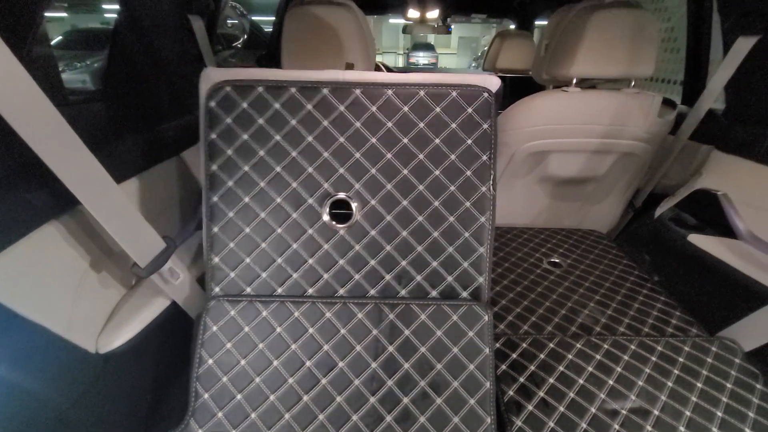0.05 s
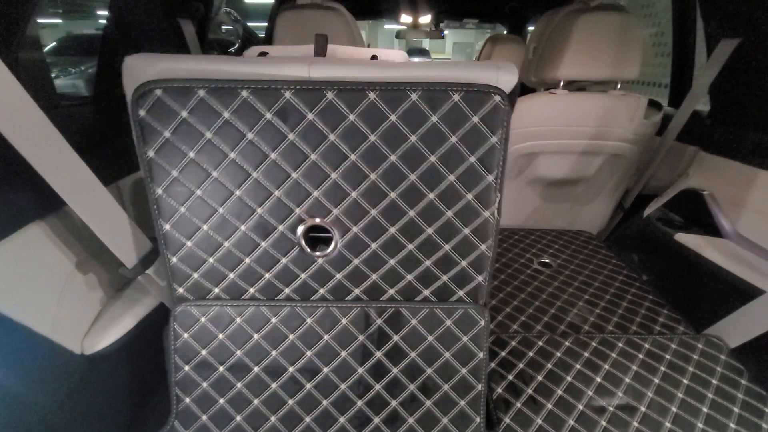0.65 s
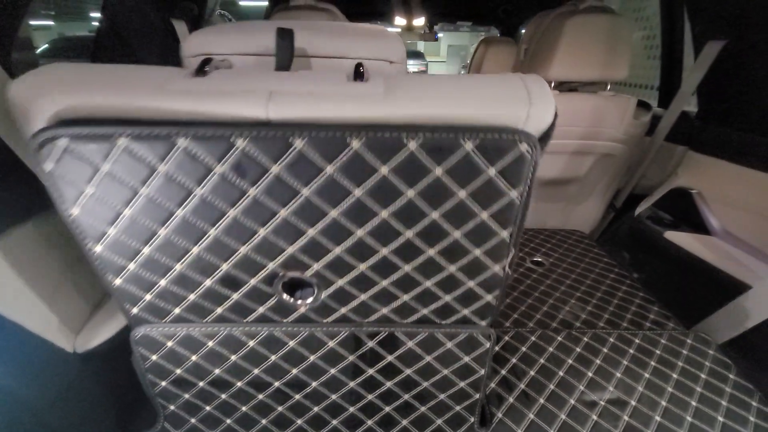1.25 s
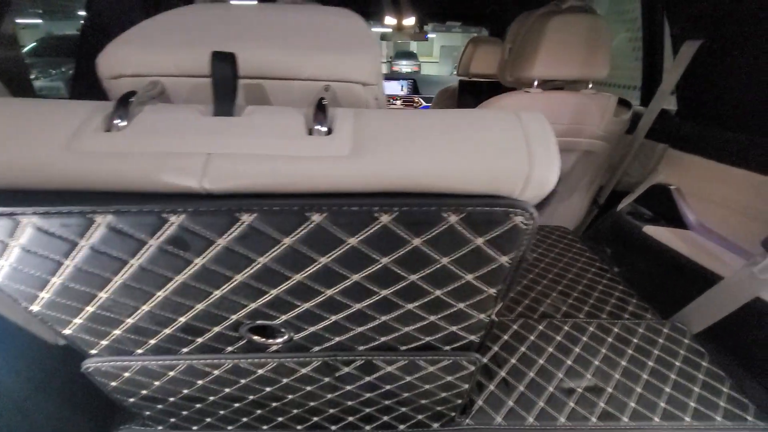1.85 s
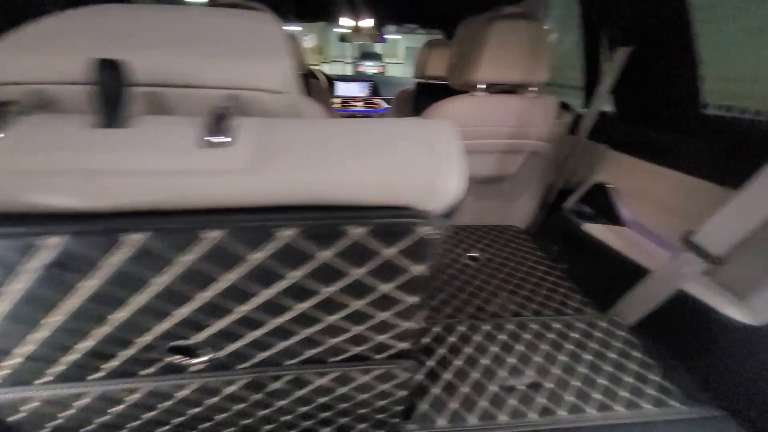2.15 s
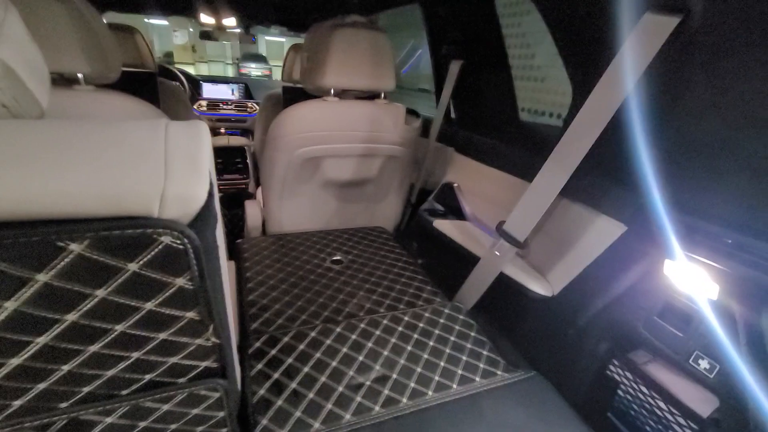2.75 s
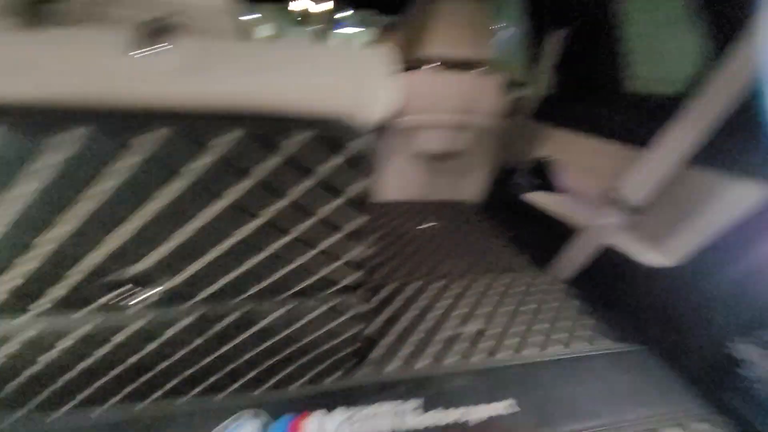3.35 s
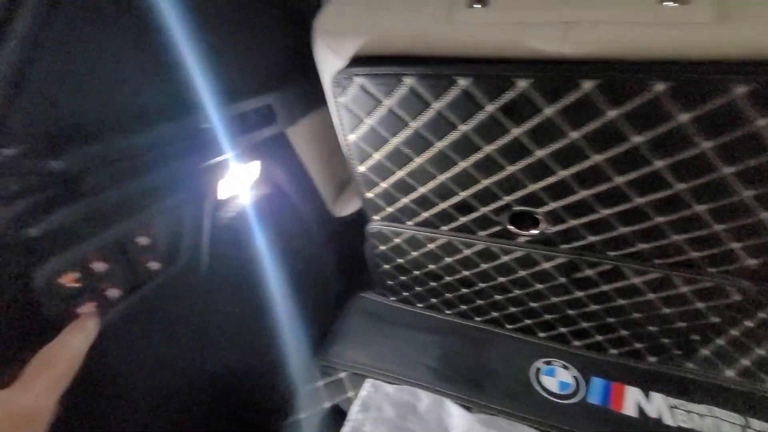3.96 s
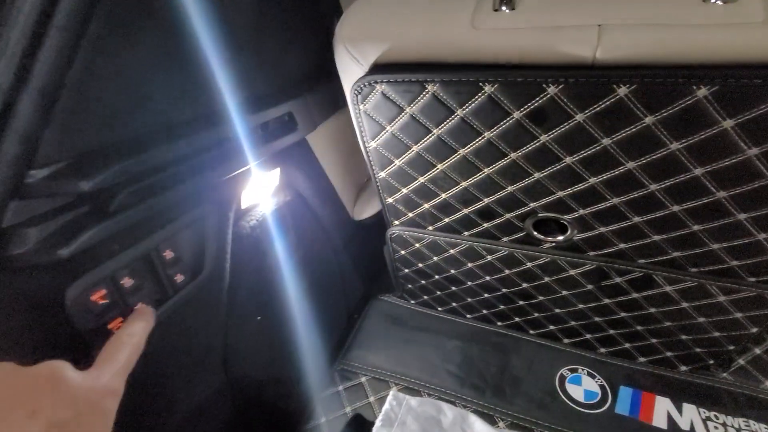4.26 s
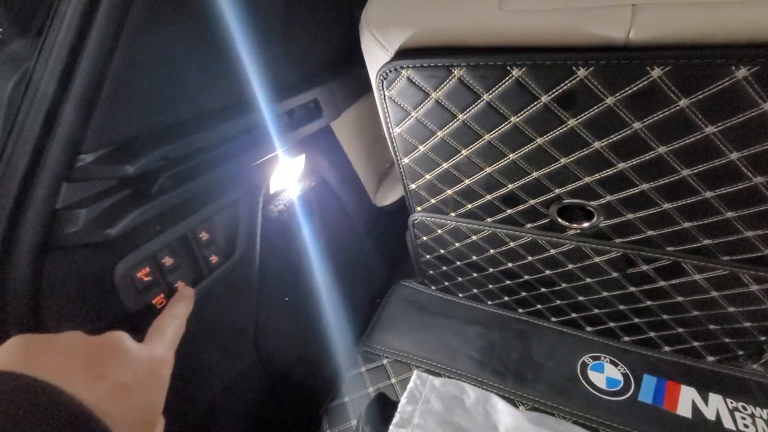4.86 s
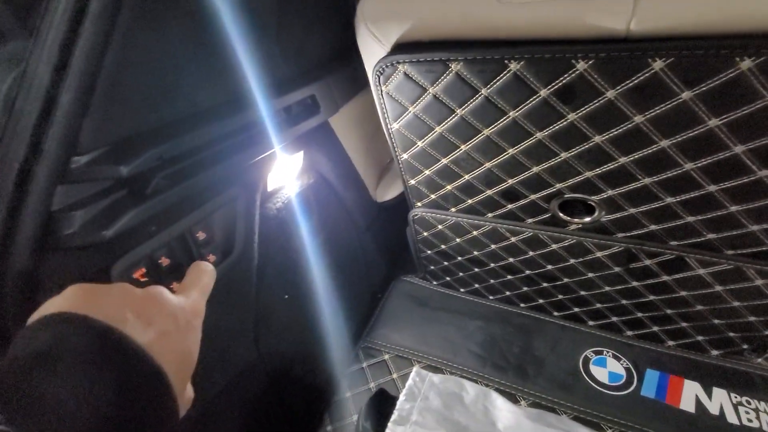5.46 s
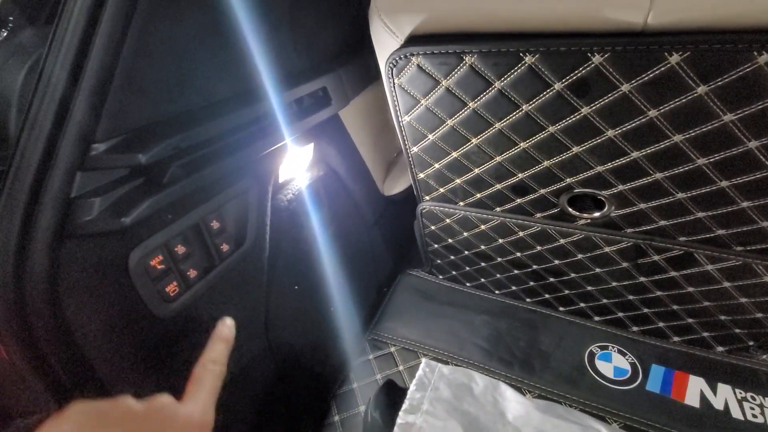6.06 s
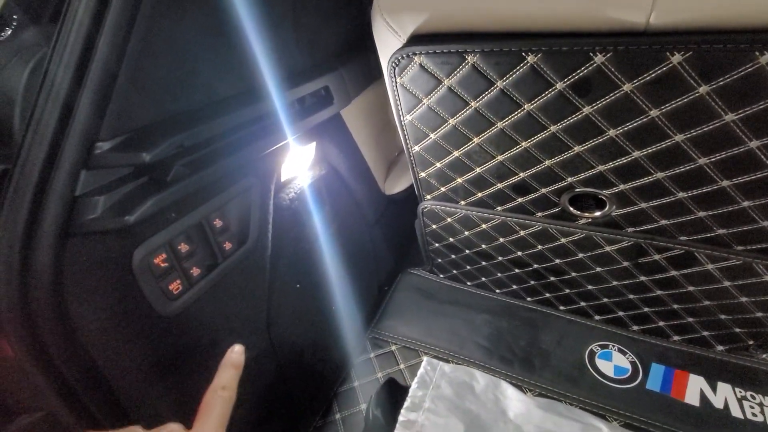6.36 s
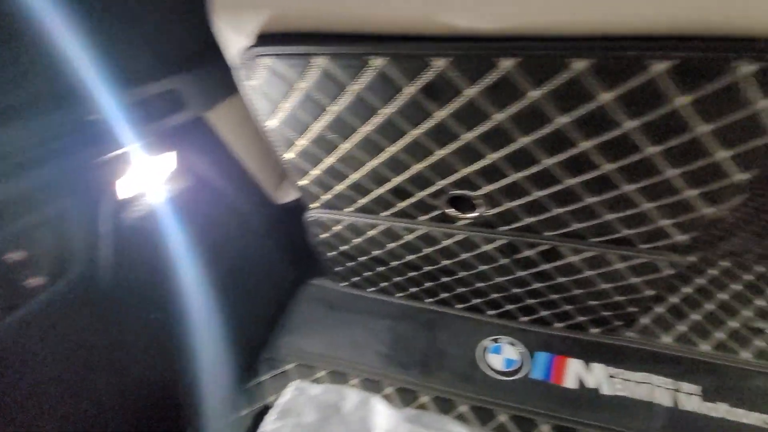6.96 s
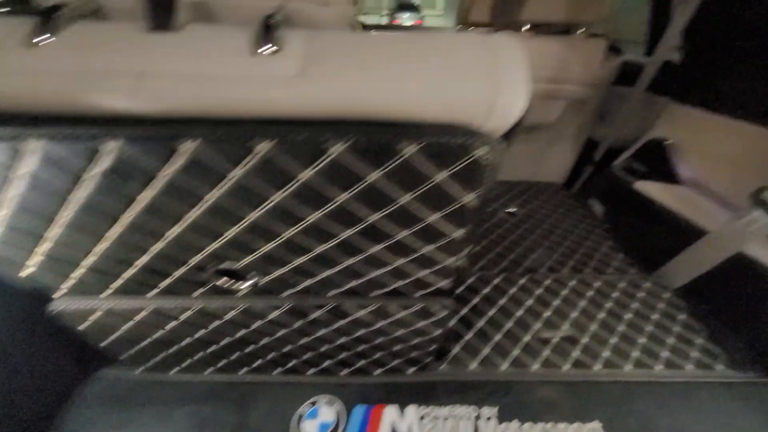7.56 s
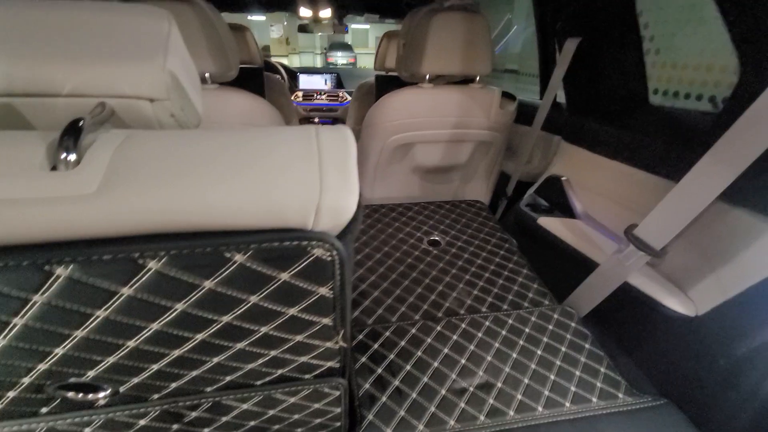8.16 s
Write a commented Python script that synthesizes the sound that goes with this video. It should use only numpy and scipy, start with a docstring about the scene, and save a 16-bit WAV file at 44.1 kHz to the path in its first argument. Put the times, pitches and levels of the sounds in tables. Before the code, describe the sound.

A faint, wavering electric whine and a few light knocks come from a folding car seat, heard up close from the open boot. The backrest lands with a heavy thump, plastic snaps and a short rattle. The low hum of the idling engine and the garage's airy rush carry on throughout. Soft finger ticks and a small switch click follow, then a loud latch clack and two short bursts of the motor.

```python
"""In a garage, at the open boot of an idling car, just behind the rear seats.
A six-cylinder engine hums through the body over the rush of fans. A small motor whines as it folds
a seat; the padded backrest ticks, then drops with a thud that rattles its frame. A switch is pressed,
and a latch clacks shut as the motor runs again."""
import sys
import numpy as np
from scipy import signal
from scipy.fft import rfft, irfft, next_fast_len
from scipy.io import wavfile
from scipy.ndimage import uniform_filter1d

SR = 44100
rng = np.random.default_rng(int(sys.argv[2]) if len(sys.argv) > 2 else 0)


def output_pcm(signal):
    """Save a mono or channel-first signal as 16-bit PCM at the path in sys.argv[1].

    Samples are clipped to [-1, 1] before scaling.
    """
    pcm = np.clip(np.atleast_2d(signal).T, -1, 1) * 32767
    wavfile.write(sys.argv[1], SR, np.round(pcm).astype(np.int16))


N = 362061
TIME = np.arange(N) / SR  # seconds since the scene began
AGE = np.arange(SR) / SR  # seconds since a blow

# tone colour of hard plastic trim: (frequency [Hz], level [dB])
PLASTIC_COLOUR = [(200, -20), (800, -1.5), (1350, 10.5), (2100, -3.5), (2900, -3), (4000, -10), (5500, -13),
                  (8000, -17.5), (12500, -19.5), (16000, -23)]


def undb(db):
    """Turn decibels into a factor to multiply by."""
    return 10 ** (np.asarray(db) / 20)


def unit(x):
    """Scale a signal so that its average size (rms) is 1."""
    return x / np.sqrt(np.mean(x ** 2))


def along(hz, table, column=1):
    """Read a table at any frequency, joining its rows on a scale of octaves."""
    table = np.array(table, float)
    return np.interp(np.log(np.maximum(hz, 1)), np.log(table[:, 0]), table[:, column])


def band(hz, half_width_hz):
    """Noise gathered around one frequency, at average size 1."""
    size = next_fast_len(N)
    f = np.fft.rfftfreq(size, 1 / SR)
    spectrum = rfft(rng.standard_normal(size)) / (1 + ((f - hz) / half_width_hz) ** 2)
    return unit(irfft(spectrum, size)[:N])


def wander(rate):
    """A smooth random wobble that heads for a new value `rate` times a second."""
    hold = int(SR / rate)
    steps = np.repeat(rng.standard_normal(N // hold + 1), hold)
    return unit(uniform_filter1d(uniform_filter1d(steps, hold), hold)[:N])


def add(out, start_s, sound):
    """Mix a stereo sound in at a given time."""
    i = int(start_s * SR)
    out[:, i:i + sound.shape[1]] += sound[:, :N - i]


def stereo(x, right_db, lag_ms):
    """The right side hears a source more softly, and later if the lag is above zero."""
    t = np.arange(len(x)) / SR
    return np.array([x, undb(right_db) * np.interp(t - lag_ms / 1000, t, x)])


def onset(rise_ms):
    """A contact that gives way builds its force over a moment."""
    return 1 - np.exp(-(1000 * AGE / rise_ms) ** 2)


def ring(modes, rise_ms):
    """The tones of a struck part; t60 is the fade time, the seconds it takes to fall by 60 dB."""
    tones = sum(undb(db - 60 * AGE / t60) * np.sin(2 * np.pi * hz * AGE) for hz, db, t60 in modes)
    return onset(rise_ms) * tones


def scatter(colour, t60, damping, tilt_db=0):
    """Many tiny echoes, different left and right; damping makes the treble die first."""
    f = np.fft.rfftfreq(SR, 1 / SR)
    octave = np.log2(np.maximum(f, 1) / 1000)
    noise = rfft(rng.standard_normal((2, SR))) * unit(undb(along(f, colour) + tilt_db * octave))
    out = 0
    for k in range(-5, 5):
        one_octave = irfft(noise * np.maximum(1 - abs(octave - k), 0))
        out = out + one_octave * undb(-60 * AGE / t60 * 2 ** (damping * k))
    return out


def air():
    """Fans and garage air rush, while pumps and blowers whirr in narrow bands."""
    # tone colour of the rush: (frequency [Hz], level [dB])
    rush_colour = [(65, -33), (110, 0.5), (201, -3), (242, -4.5), (291, -4), (373, -8), (520, -12.5),
                   (739, -13.5), (1000, -18), (1240, -19.5), (3710, -27), (5070, -34.5), (15500, -58.5)]
    # stereo spread: (frequency [Hz], side level above mid [dB], lean to the left [0-1])
    spread = [(100, -11, 1), (380, 4, 1), (700, 5, 0.5), (1290, 6.5, .5), (2500, 1, 0.61), (8000, 0, 0.78)]
    # resonances of pumps and fans: (frequency [Hz], width [Hz], level [dB])
    whirrs = [(288, 33, -60), (739, 86, -61.5), (1920, 310, -65), (3074, 570, -68), (3732, 100, -72),
              (5910, 520, -78.5), (7340, 880, -78)]
    f = np.fft.rfftfreq(N, 1 / SR)
    noise, other_noise = rfft(rng.standard_normal((2, N)))
    colour = undb(along(f, rush_colour))
    midrange = irfft(noise * colour * (f > 500) * (f < 4000), N)
    gain = undb(-60) / np.std(midrange)
    lean = np.clip(along(f, spread, column=2), 0, 1)
    mid = irfft(noise * colour, N)  # what both ears share
    side_noise = lean * noise + np.sqrt(1 - lean ** 2) * other_noise
    side = irfft(side_noise * colour * undb(along(f, spread)), N)  # what sets them apart
    whirr = 0
    for hz, width, db in whirrs:
        level = undb(db + wander(1.977))
        whirr = whirr + level * np.array([band(hz, width / 2), undb(-6) * band(hz, width / 2)])
    return gain * np.array([mid + side, mid - side]) * undb(0.087 * wander(23)) + whirr


def machine_hums():
    """Other machines in the garage give faint, wavering tones that swell and fade."""
    # the hums: (pitch [Hz], level [dB], loudest at [s], half length [s])
    hums = [(505.5, -60, 3.8, 17), (1004, -63.5, 3, 1.3), (443, -53, 5.6, 0.33), (318, -50.5, 7.05, 0.6),
            (355.4, -58, 6.54, 1.6), (281, -52.5, 6.9, 0.43)]
    out = 0
    for hz, db, peak_s, half_s in hums:
        phase = 2 * np.pi * np.cumsum(hz * (1 + 0.00607 * wander(25))) / SR
        level = undb(db + 1.8 * wander(9))
        swell = np.exp(-((TIME - peak_s) / half_s) ** 2)
        out = out + np.sin(phase) * level * swell
    return stereo(out, right_db=-11.5, lag_ms=0)


def engine():
    """The engine idles: uneven burning makes each of its tones waver, and the car body booms."""
    # engine tones, 6 being the firing rate: (waves per engine cycle [count], level [dB])
    tones = [(4, -18), (6, -7.5), (9, -9), (12, 1), (14, -17.5), (15, -21), (18, -18.5), (24, -24),
             (30, -29.5), (45, -22.5), (48, -31.5), (51, -27), (54, -27.5)]
    firing_hz, drift, idle_db = 38.6, 0.004973, -37.5
    hz = firing_hz * (1 + drift * wander(1.4))  # the speed control lets the idle drift a little
    cycle = 2 * np.pi * np.cumsum(hz) / SR / 6  # six firings make one cycle
    boom = band(88, 13)
    hum = undb(-11.5) * boom
    for multiple, db in tones:
        # the firing tones are steadier; the others arise because the cylinders are not quite alike
        roughness = .11 if multiple in (6, 12) else .5
        phase = multiple * cycle + rng.uniform(0, 2 * np.pi)
        waver = wander(14) * np.sin(phase) + wander(12) * np.cos(phase)
        hum = hum + np.sqrt(2) * undb(db) * (np.sin(phase) + roughness * waver)
    return stereo(hum * undb(idle_db), right_db=-8, lag_ms=-.15)


def rustles():
    """Seat fabric rubs harder as the backrest folds, a sleeve brushes, and a surface squeaks once."""
    # sleeve movements: (time [s], half length [s], level [dB])
    movements = [(2.55, 0.39, -78), (3.517, 0.21, -72.5), (7.35, 0.24, -73.5), (7.61, .08, -73),
                 (7.95, 0.042, -64), (8.05, 0.11, -67.5)]
    start_s, end_s, growth_db_per_s = 0.27, 1.74, 4.5
    folding = uniform_filter1d(1. * (TIME > start_s) * (TIME < end_s), SR // 8)
    rub_level = folding * undb(-67 + growth_db_per_s * (TIME - end_s))
    rub = np.array([band(5100, 5900), undb(-11.5) * band(7600, 5000)]) * rub_level
    swell = sum(undb(db) * np.exp(-((TIME - s) / half_s) ** 2) for s, half_s, db in movements)
    sleeve = np.array([band(8900, 6500), undb(-8.5) * band(11000, 6500)]) * swell
    grain = undb(1.6 * wander(160))
    squeak = band(10800, 380) * np.exp(-((TIME - 3.5) / .12) ** 4)
    squeak *= undb(-77.5 + 4.6 * wander(45))  # the surface sticks and slips
    return (rub + sleeve) * grain + stereo(squeak, right_db=-15, lag_ms=0)


def ping(hz, t60):
    """A small hard part rings briefly."""
    tone = band(hz, 0.069 * hz)[:SR] * undb(-60 * AGE / t60) * onset(0.49)
    return stereo(tone, right_db=-18, lag_ms=0)


def switch():
    """A finger ticks on the panel; the switch gives a light tick, then a fuller click."""
    # the switch's two clicks: (time [s], level [dB], treble tilt [dB per octave])
    snaps = [(5.408, -50, 3), (5.428, -40, -2.5)]
    # tone colour of its hollow plastic case: (frequency [Hz], level [dB])
    case_colour = [(300, -13), (1000, -10), (1600, 2), (2200, 2), (2700, -13), (3250, 3), (4200, -18),
                   (6000, -8), (10000, -21), (15000, -35)]
    # fingertip touches: (time [s], level [dB])
    touches = [(4.418, -61), (5.02, -66), (5.2315, -58.5), (5.72, -61), (5.794, -59)]
    out = np.zeros((2, N))
    for s, db, tilt_db in snaps:
        snap = scatter(case_colour, t60=0.036, damping=.1, tilt_db=tilt_db) * onset(1)
        add(out, s, undb(db) * snap * undb([[0], [-4]]))  # left and right levels
    for s, db in touches:
        tick = scatter(PLASTIC_COLOUR, t60=.06, damping=.05, tilt_db=4) * onset(2.5)
        ringing = undb(-4.5) * ping(hz=6400, t60=0.07)
        add(out, s, undb(db) * (tick * undb([[0], [-3.5]]) + ringing))
    return out


def trim_clicks():
    """Hard plastic snaps: a short crack, a small part that rings and a faint echo in the cabin."""
    # snaps: (time [s], level [dB], fade time [s], treble tilt [dB per octave], ring pitch [Hz])
    snaps = [(1.0943, -26.5, 0.033, 2.5, 1420), (1.097, -26.5, 0.047, 0.5, 3070),
             (1.6328, -20.5, 0.081, 6, 5480), (1.6462, -14, 0.051, .5, 2970),
             (2.423, -51, 0.054, 2.5, 3000)]
    out = np.zeros((2, N))
    for s, db, t60, tilt_db, hz in snaps:
        crack = scatter(PLASTIC_COLOUR, t60, damping=0.044, tilt_db=tilt_db)
        crack *= onset(rise_ms=45 * t60)  # longer snaps also build more slowly
        echo = scatter(PLASTIC_COLOUR, t60=0.2, damping=0.13, tilt_db=tilt_db) * onset(3)
        snap = (crack + undb(-13.5) * echo) * undb([[0], [-3.5]])
        add(out, s, undb(db) * (snap + undb(-7) * ping(hz, t60=0.052)))
    return out


def seat_motor():
    """The motor's whine sags under load and swells where its case resonates; its brushes hiss softly."""
    # motor speed under a changing load, one list per run: (time [s], pitch of the lower tone [Hz])
    runs = [
        [(0, 735), (.15, 755), (.39, 803), (.6, 789), (.8, 738), (1.08, 700)],
        [(1.1, 715), (1.25, 775), (1.48, 868), (1.66, 886)],
        [(7.64, 830), (7.7, 870), (7.77, 826), (7.85, 860), (7.91, 775)],
        [(8.07, 857), (8.21, 828)],
    ]
    # loudness of the whine, one value per run: (level [dB])
    run_levels = [-52.5, -59.5, -52, -53.5]
    # resonances of the motor's case: (frequency [Hz], width [Hz], level [dB])
    resonances = [(1386, 110, -7.5), (1604, 110, -3), (1786, 100, 7.5)]
    out = 0
    for run, db in zip(runs, run_levels):
        times, pitches = np.transpose(run)
        hz = np.interp(TIME, times, pitches)
        phase = 2 * np.pi * np.cumsum(hz * (1 + .005 * wander(90))) / SR
        running = uniform_filter1d(1. * (TIME >= times[0]) * (TIME <= times[-1]), SR // 20)
        flutter = undb(1.3 * wander(70) + 1.5 * wander(16))
        case_gain = sum(undb(peak_db) / (1 + (2 * (2 * hz - peak_hz) / width) ** 2) ** 0.84
                        for peak_hz, width, peak_db in resonances)
        whine = case_gain * np.sin(2 * phase)
        low_tone = undb(-6) * np.sin(phase)  # an octave down, not shaped by the case
        brushes = undb(-55.5) * band(700, 510)
        out = out + running * ((whine + low_tone) * flutter * undb(db) + brushes)
    # the gearbox drones while it carries the backrest
    gearbox = undb(-55.5) * band(518, 3.5) * np.interp(TIME, [.6, 1.8], [1, 0])
    return stereo(out + gearbox, right_db=-8.5, lag_ms=0.16)


def knock(db, hz, t60):
    """One part is struck, sets the seat frame ringing and echoes in the cabin."""
    # tones of the seat frame: (pitch [Hz], level [dB], fade time [s])
    frame_tones = [(521, -12, 0.42), (563, -17.5, 0.3), (667, -17.5, 0.4), (733, -31, 0.18),
                   (800, -14.5, 0.22), (1164, -21, 0.12), (1265, -37, 0.17), (1420, -36, 0.093),
                   (1550, -23, 0.063), (1764, -22, .16), (2030, -21, 0.14)]
    # tone colour of a knock's cabin echo: (frequency [Hz], level [dB])
    echo_colour = [(100, -40), (300, 5), (700, 10), (1400, 6.5), (2300, -9.5), (3000, -17), (4000, -16),
                   (8000, -29), (15000, -67)]
    rise_ms = 0.53 * undb(-.55 * db)  # lighter knocks sink into the padding more slowly
    part = ring([(hz, 0, t60)], rise_ms)
    frame = undb(-14.5) * ring(frame_tones, rise_ms)
    direct = stereo(part + frame, right_db=-15.5, lag_ms=1)
    echo = scatter(echo_colour, t60=0.11, damping=0.91) * onset(0.37) * undb([[-19], [-21.5]])
    return undb(db) * (direct + echo)


def backrest():
    """The padded backrest shifts twice, drops and bounces, while lighter parts knock in its frame."""
    # tones of the padded panel: (pitch [Hz], level [dB], fade time [s])
    panel_tones = [(38.4, -23, 0.92), (64.1, -16, 0.5), (111.4, -25, 0.7), (161.3, -10.5, 0.17),
                   (203, -6.5, 0.14), (220, -1.5, 0.091), (272, -19, 0.26), (388, -21.5, 0.234)]
    # thuds, each also striking the hinge: (time [s], panel level [dB], hinge level [dB])
    thuds = [(0.583, -35, -24.5), (1.033, -29, -23.5), (1.6336, 1, -13.5), (1.705, -20.5, -14.5),
             (1.7556, -21.5, -16.5), (1.7766, -26, -12.5)]
    # knocks of lighter parts: (time [s], level [dB], pitch [Hz])
    knocks = [(.563, -25.5, 1080), (1.043, -21, 1400), (1.6312, 6, 1080), (1.6476, -5, 1590),
              (1.652, -3.5, 754), (1.678, -14.5, 1220), (2.423, -30, 1420)]
    ring_cycles, choke_db = 20.6, 2
    out = np.zeros((2, N))
    for s, panel_db, hinge_db in thuds:
        panel = undb(panel_db) * stereo(ring(panel_tones, rise_ms=4.2), right_db=-8, lag_ms=0.53)
        hinge = knock(hinge_db, hz=536, t60=0.033)
        add(out, s, panel + hinge)
    for s, db, hz in knocks:
        choke = 1 + undb(db - choke_db) ** 2  # a hard blow presses the part tight and shortens its ring
        add(out, s, knock(db, hz, t60=ring_cycles / hz / choke))
    return out


def latch():
    """The catch snaps shut under the seat padding and echoes briefly in the cabin."""
    # tones of the latch: (pitch [Hz], level [dB], fade time [s])
    latch_tones = [(403, -35, 0.18), (560, -25.5, 0.075), (740, -19, 0.019), (836, -5, 0.024),
                   (874, -20.5, 0.099), (948, -27.5, 0.2), (1170, -27, 0.17), (1545, -9, 0.023),
                   (1770, -25, 0.045), (1950, -30.5, 0.058), (3300, -43.5, 0.034), (5400, -50, 0.028)]
    # tone colour of its cabin echo: (frequency [Hz], level [dB])
    echo_colour = [(150, -16), (400, -9), (900, 9), (1300, -4), (1600, -3), (2100, -4), (2600, -21),
                   (5500, -28), (9000, -46), (15000, -49)]
    snap_s, snap_db = 7.6068, 3.25
    out = np.zeros((2, N))
    direct = stereo(ring(latch_tones, rise_ms=1.35), right_db=-6, lag_ms=-0.36)
    echo = scatter(echo_colour, t60=0.28, damping=0.32) * onset(0.84) * undb([[-33], [-34]])
    add(out, snap_s, undb(snap_db) * (direct + echo))
    return out


def scene():
    """Everything heard at the open boot."""
    background = engine() + air() + machine_hums()
    return background + seat_motor() + backrest() + latch() + trim_clicks() + switch() + rustles()


def record(dry):
    """Flatten any peak beyond full scale, then cut the highest treble."""
    top_hz = 15800
    low_pass = signal.ellip(10, .2, 80, top_hz, fs=SR, output="sos")
    return signal.sosfilt(low_pass, np.clip(dry, -1, 1))


dry = scene()
out = record(dry)
output_pcm(out)
```